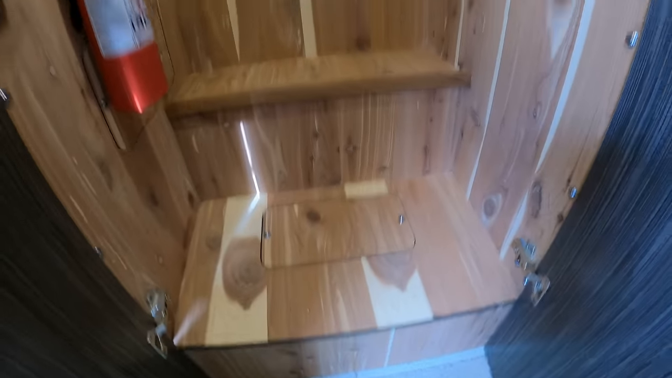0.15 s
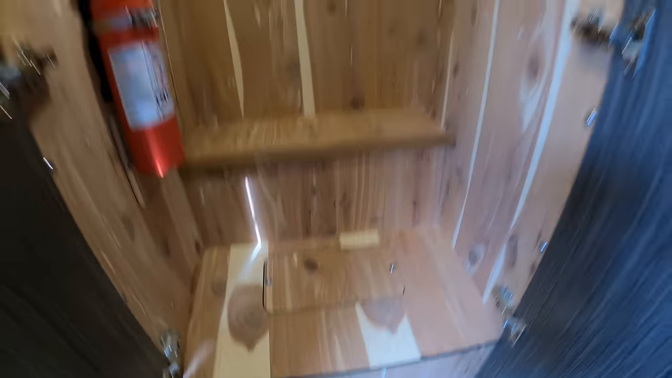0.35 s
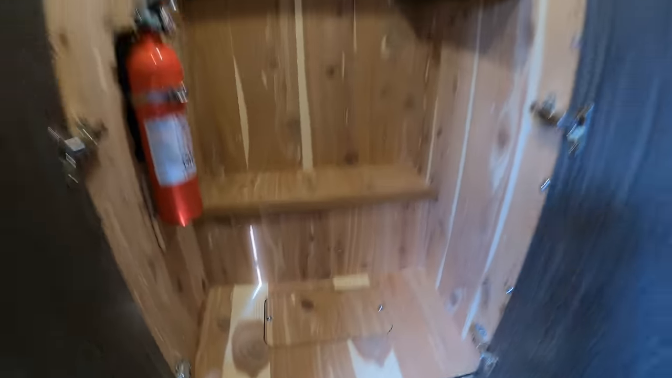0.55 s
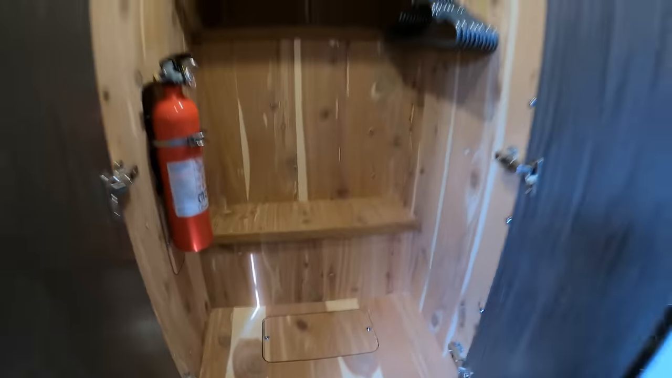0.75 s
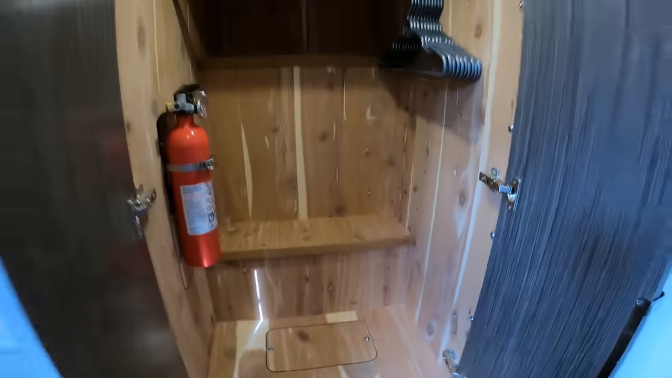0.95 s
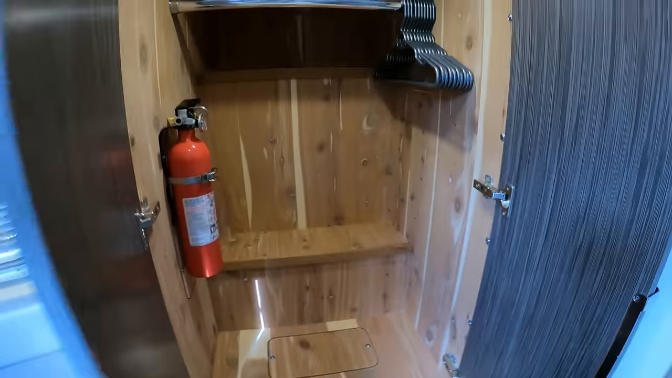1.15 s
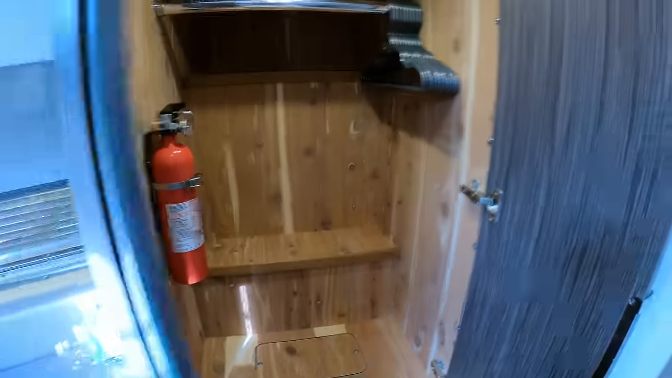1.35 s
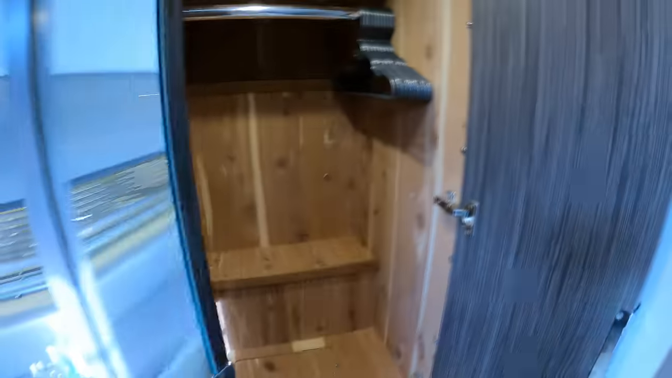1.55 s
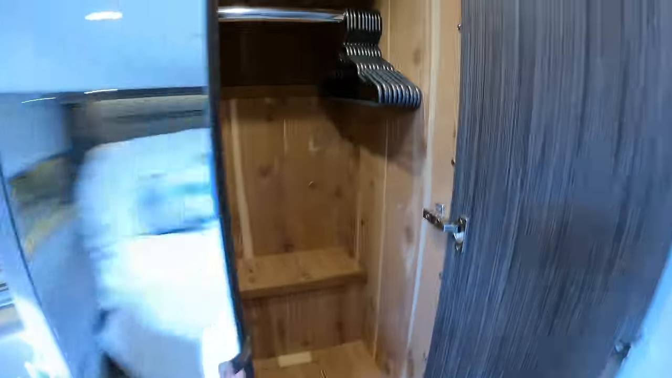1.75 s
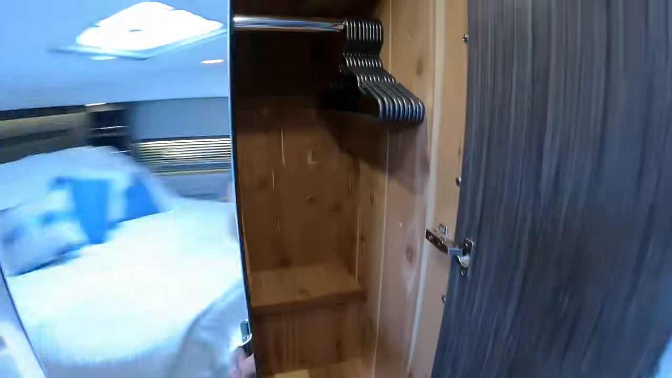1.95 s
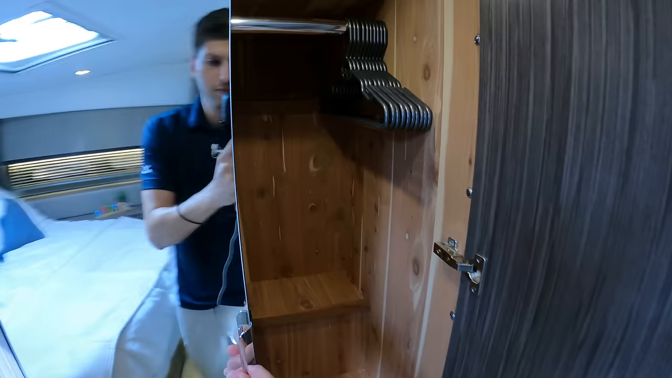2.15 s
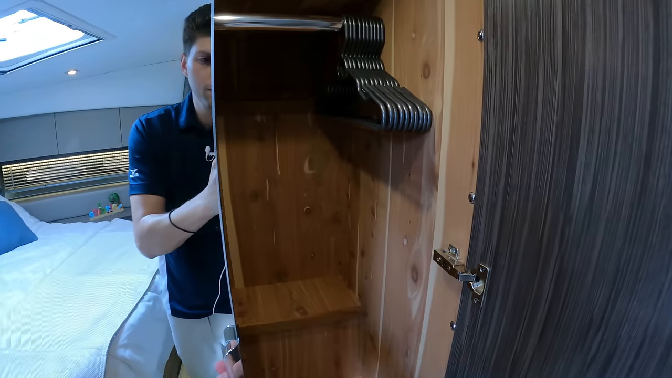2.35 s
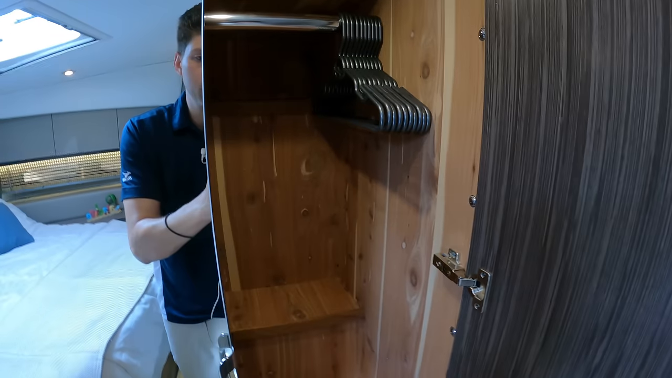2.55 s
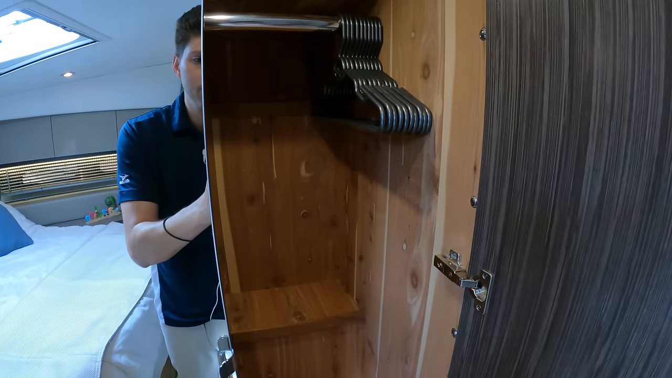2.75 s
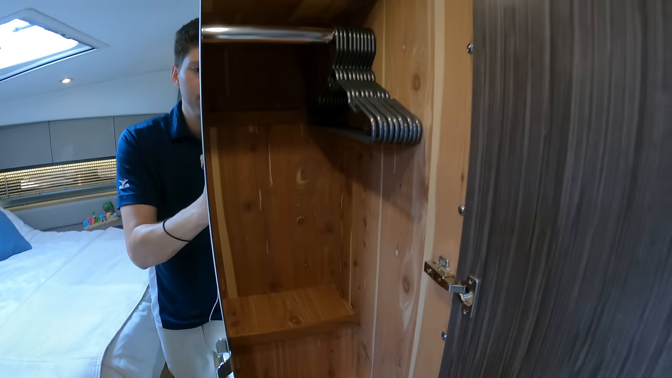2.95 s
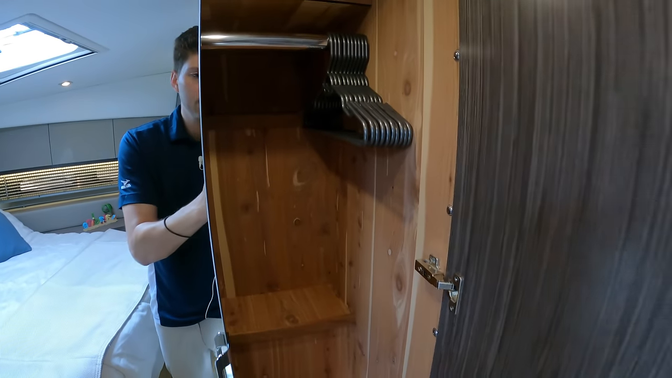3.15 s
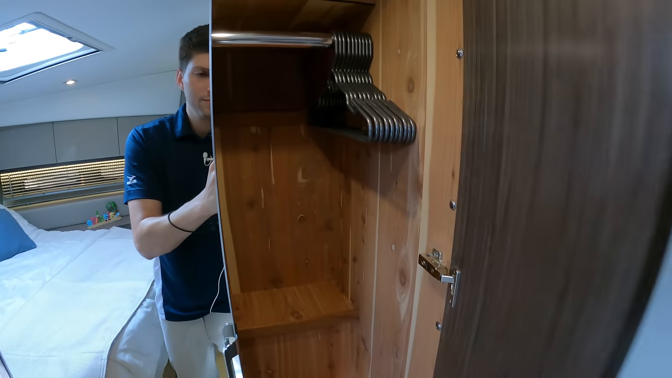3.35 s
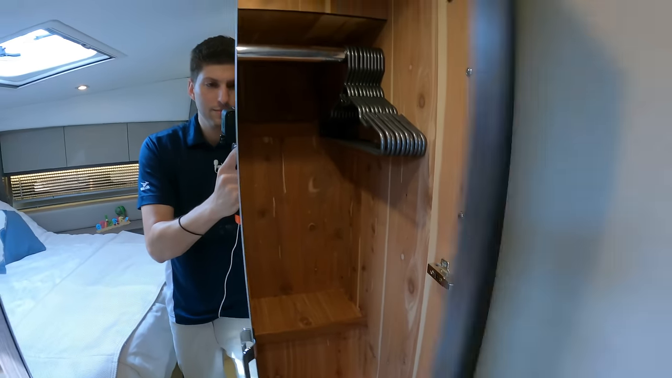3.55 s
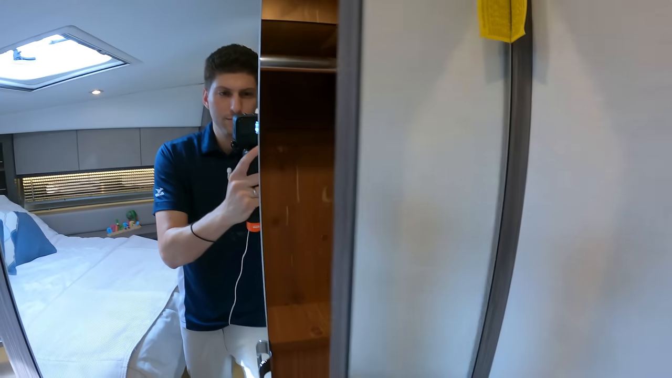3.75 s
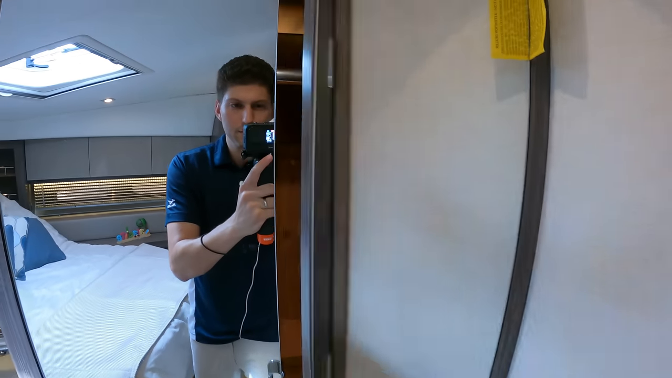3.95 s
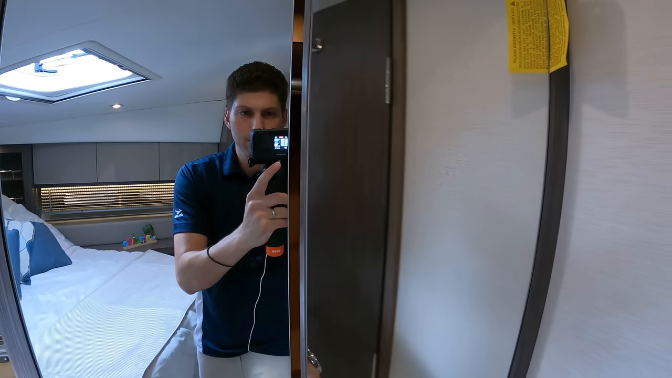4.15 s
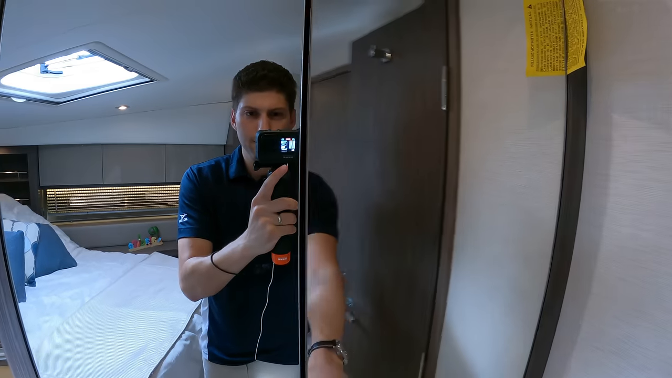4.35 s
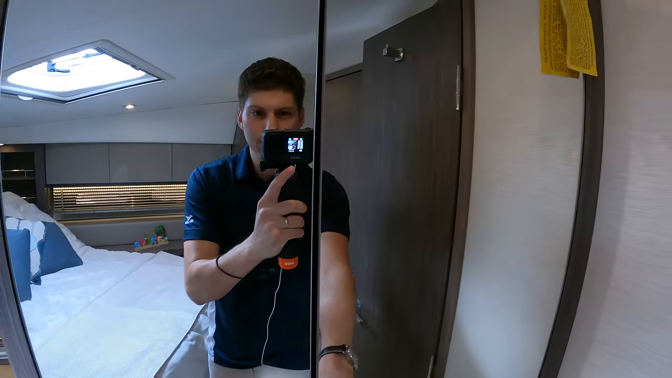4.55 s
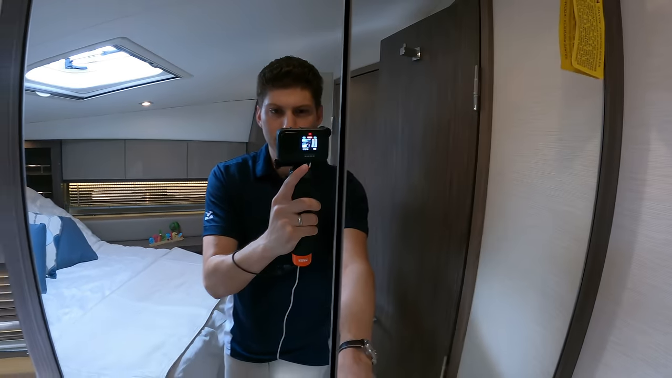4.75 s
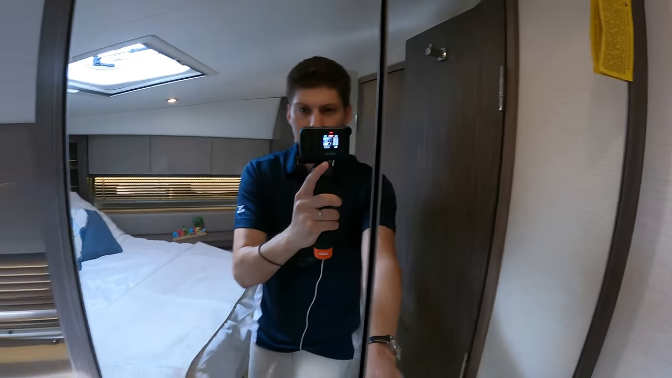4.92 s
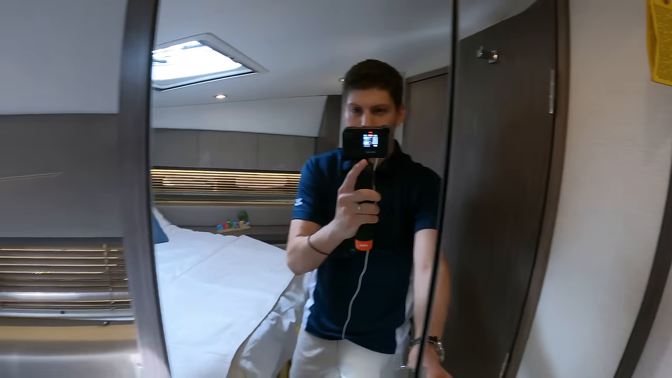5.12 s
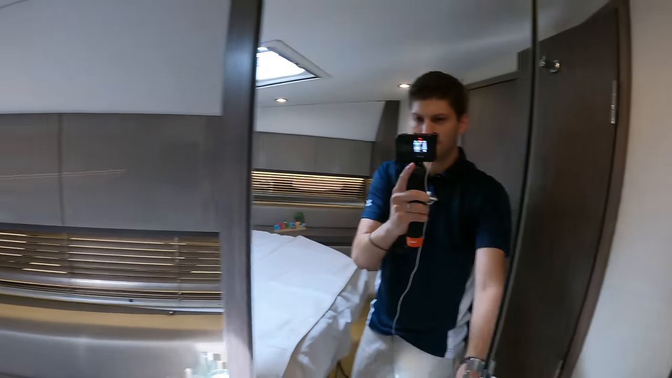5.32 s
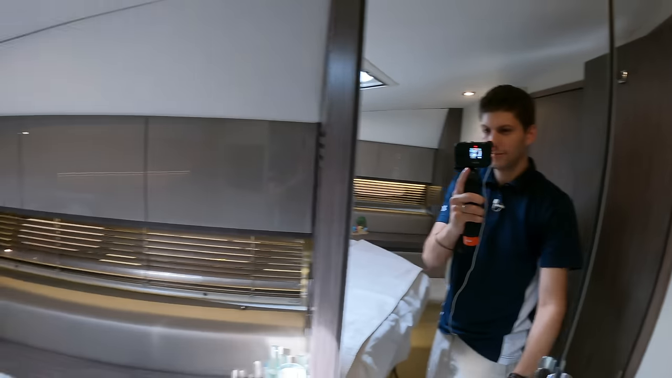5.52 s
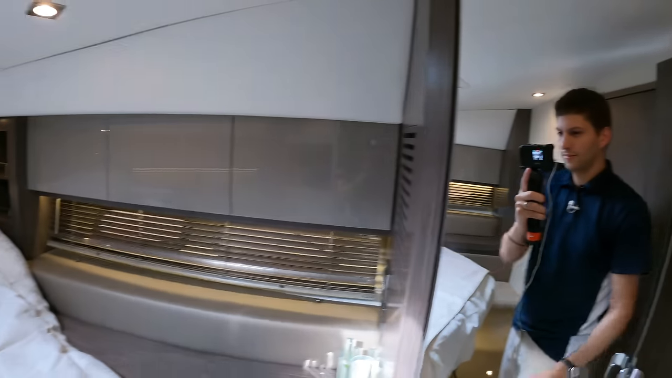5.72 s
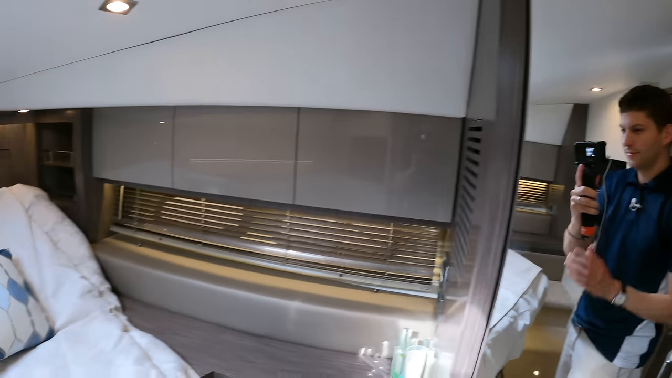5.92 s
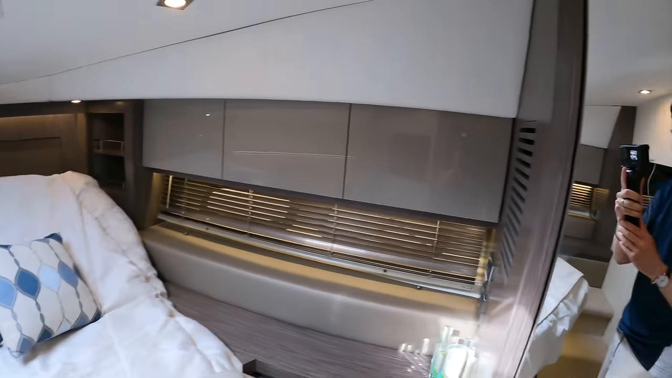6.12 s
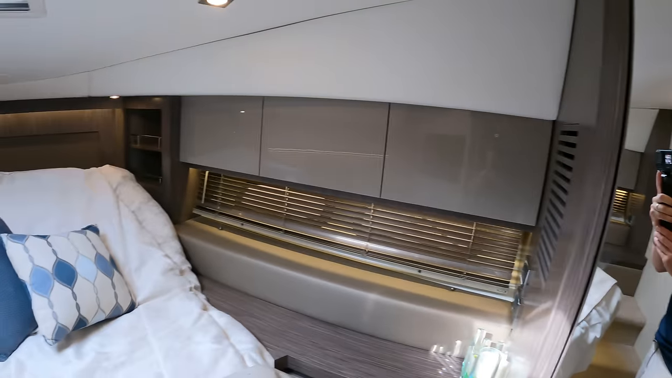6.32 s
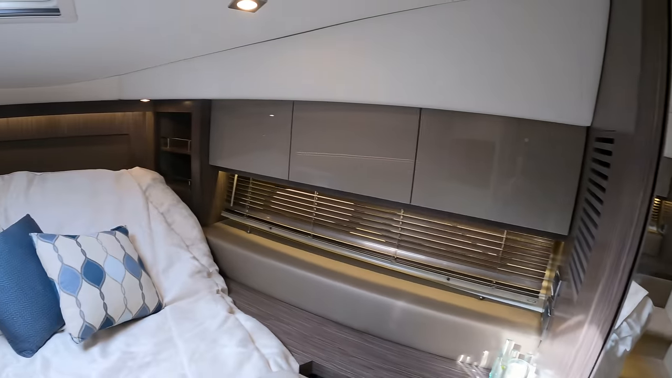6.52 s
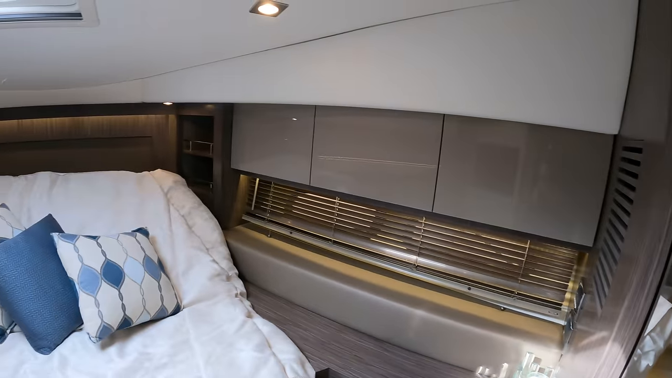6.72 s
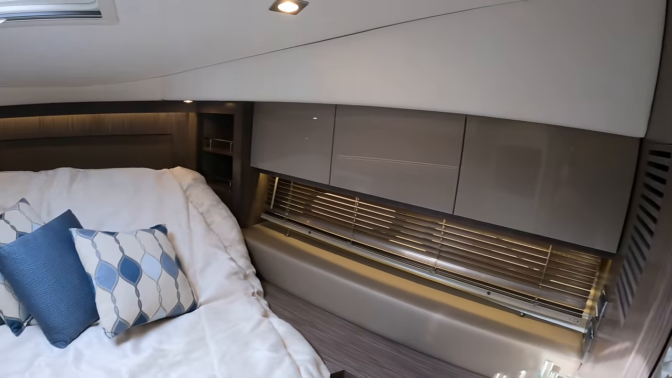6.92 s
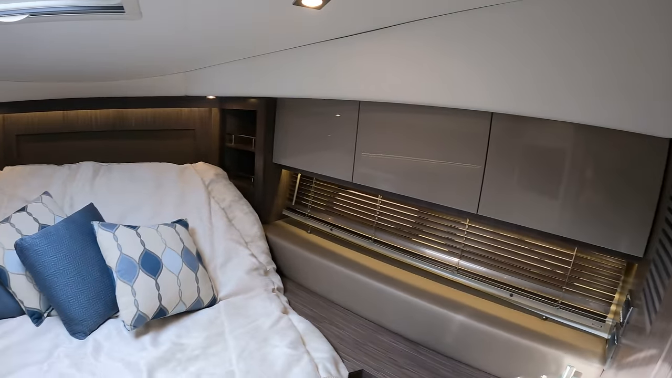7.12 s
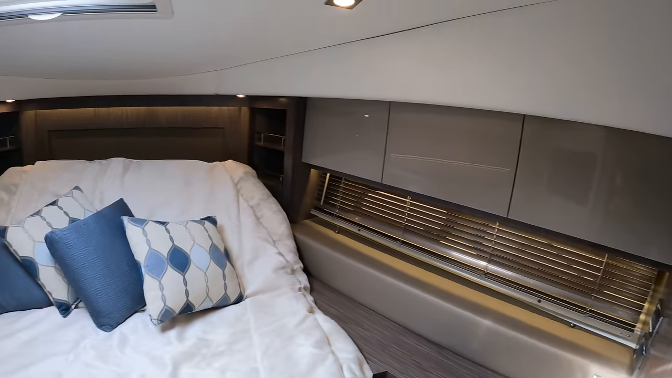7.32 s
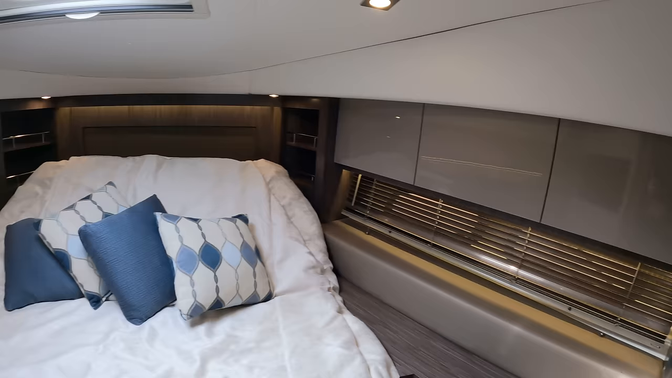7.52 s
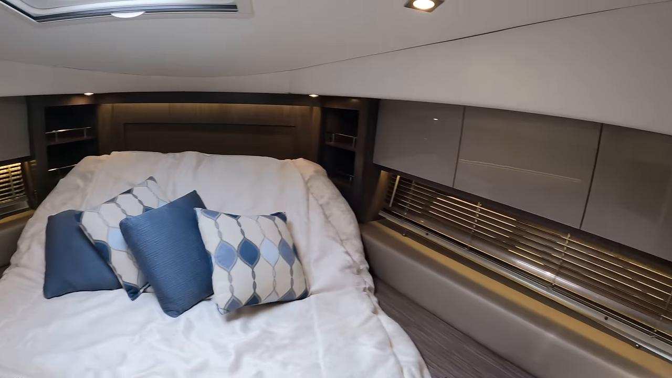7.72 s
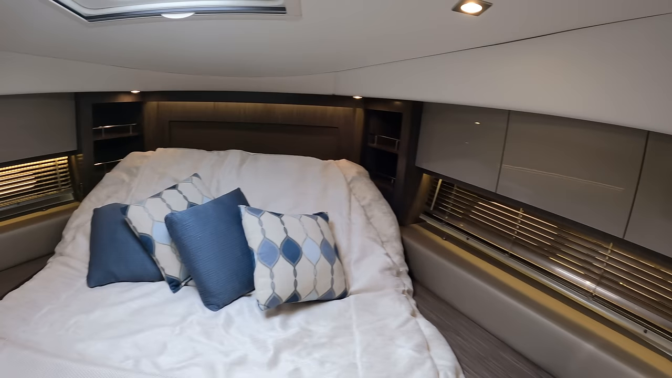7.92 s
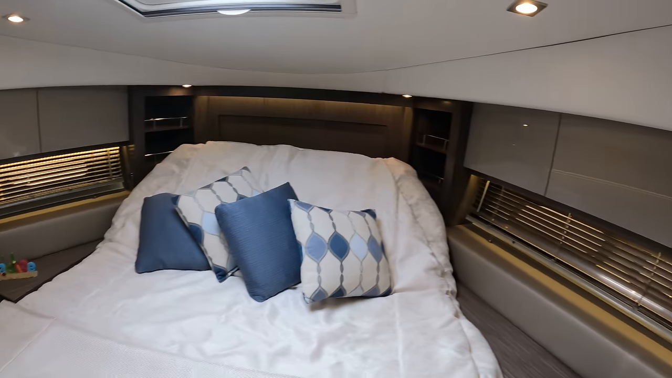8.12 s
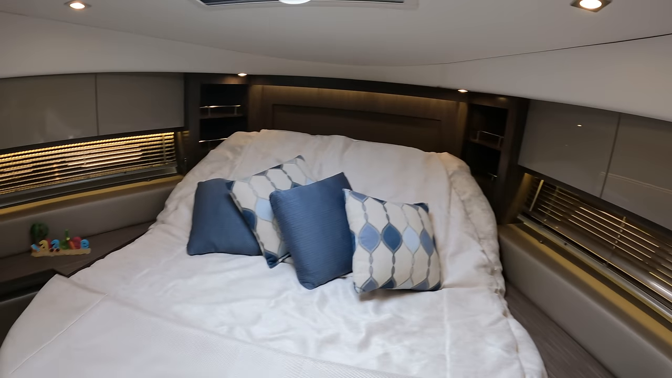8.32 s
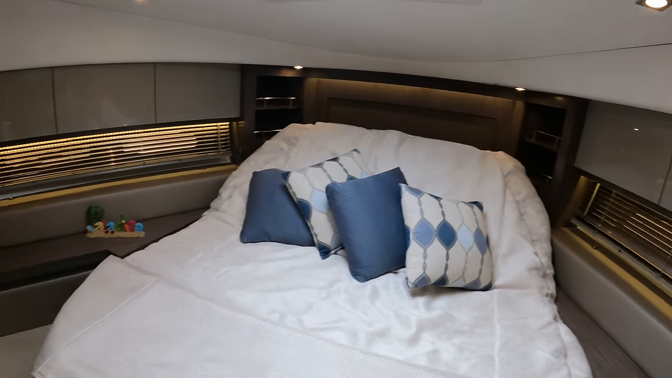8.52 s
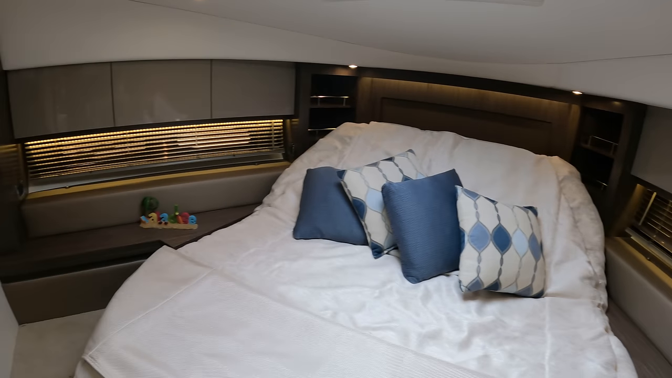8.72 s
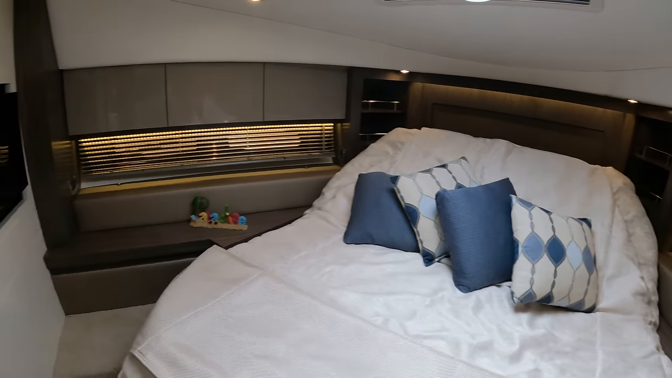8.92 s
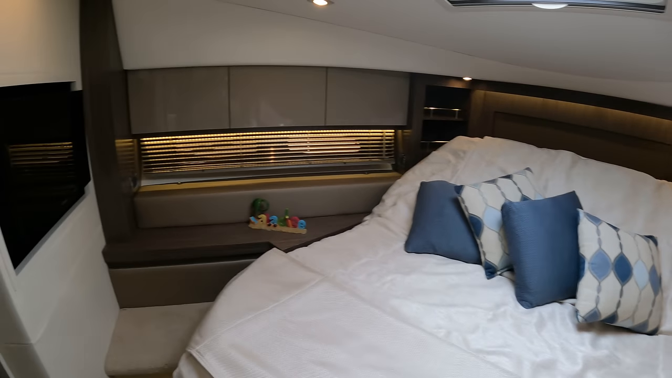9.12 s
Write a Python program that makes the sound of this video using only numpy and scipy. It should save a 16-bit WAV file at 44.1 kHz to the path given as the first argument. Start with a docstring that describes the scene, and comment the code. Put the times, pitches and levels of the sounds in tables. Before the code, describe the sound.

Two wooden closet doors latch and bang closed one after another in a small padded cabin, with light taps and constant low humming air.

```python
"""In a small, padded boat cabin, two wooden closet doors are swung shut: the first knocks twice on its way,
then each snaps into its metal latch, slams on the frame and sets the closet booming.
Hands tap the panels, hinges rub, doors and sleeves swish, low rumbles swell and the ventilation hums throughout.
Contacts are noise cracks with a reverberant tail plus decaying modes; swings, taps and booms are damped sines.
Friction, swishes, rumble and air are coloured noise."""
import sys
import numpy as np
from scipy import signal
from scipy.fft import rfft, irfft, next_fast_len
from scipy.io import wavfile
from scipy.ndimage import map_coordinates

SR = 44100
rng = np.random.default_rng(int(sys.argv[2]) if len(sys.argv) > 2 else 0)


def output_pcm(signal):
    """Save a mono or channel-first signal as 16-bit PCM at the path in sys.argv[1].

    Samples are clipped to [-1, 1] before scaling.
    """
    pcm = np.clip(np.atleast_2d(signal).T, -1, 1) * 32767
    wavfile.write(sys.argv[1], SR, np.round(pcm).astype(np.int16))


N = 408807  # length [samples]


def amp(db):
    """Decibels to gain."""
    return 10 ** (np.asarray(db) / 20)


def unit(x):
    """Scale to rms 1."""
    return x / np.sqrt(np.mean(x ** 2) + 1e-20)


def along(points, hz):
    """Read (frequency [Hz], value) points on a log frequency axis."""
    point_hz, values = np.transpose(points)
    return np.interp(np.log(hz + 1), np.log(point_hz), values)


def wobble(rate):
    """A smooth random curve with rate knots a second."""
    return map_coordinates(rng.standard_normal(400), [np.arange(N) * rate / SR], mode="mirror")


def filtered(x, response):
    """Filter x by a gain that depends on frequency."""
    size = next_fast_len(len(x) + 8192)
    hz = np.fft.rfftfreq(size, 1 / SR)
    return irfft(rfft(x, size) * response(hz), size)[:len(x)]


def noise(response):
    """Noise of rms 1 coloured by the given response."""
    return unit(filtered(rng.standard_normal(N), response))


def causal(colour, tilt_db, size=4096):
    """Minimum-phase impulse response of energy 1: a colour tilted in dB per octave above 250 Hz."""
    hz = np.fft.rfftfreq(size, 1 / SR)
    level_db = along(colour, hz) + tilt_db * np.log2(np.maximum(hz, 250))
    cepstrum = irfft(np.log(amp(level_db)))
    # folding the cepstrum onto positive times puts the energy at the start
    cepstrum[1:size // 2] *= 2
    cepstrum[size // 2 + 1:] = 0
    response = irfft(np.exp(rfft(cepstrum)))
    return response / np.linalg.norm(response)


def add(track, s, sound):
    """Mix a sound into the track at time s."""
    part = track[round(s * SR):][:len(sound)]
    part += sound[:len(part)]


# how long the padded cabin reverberates: (frequency [Hz], t60 [s])
CABIN_DECAY = [(80, 0.46), (300, 0.26), (800, .17), (2000, .155), (6000, 0.16), (10000, 0.16),
               (15000, 0.14)]


def contact(colour, tilt_db, crack_db, crack_s):
    """A short crack over the cabin's dense reflections, whose bass lingers longest."""
    hz, frames, spectrum = signal.stft(rng.standard_normal(SR // 2), SR, nperseg=256)
    decay = amp(-60 * frames / along(CABIN_DECAY, hz)[:, None])
    tail = signal.istft(spectrum * decay, SR, nperseg=256)[1][:SR // 2]
    t = np.arange(len(tail)) / SR
    crack = 2 * amp(crack_db) * np.exp(-t / crack_s) * rng.standard_normal(len(t))
    rise = 0.00045 * 2 ** (-tilt_db / 2.4)  # a duller contact is softer and builds more slowly
    burst = (crack + tail) * (1 - np.exp(-t / rise))
    return signal.fftconvolve(burst, causal(colour, tilt_db))[:len(t)]


def ring(modes, tilt_db):
    """Decaying modes, struck at new strengths by every blow; none rings longer than a t60 of 0.18 s."""
    t = np.arange(SR // 2) / SR
    hz, db, t60 = np.transpose(modes)[:, :, None]
    t60 = np.minimum(t60, .18)
    strength = amp(db + tilt_db * np.log2(hz) + rng.normal(0, 1.5, hz.shape))
    swings = np.sin(2 * np.pi * (hz * t + rng.random(hz.shape))) * amp(-60 * t / t60)
    mixed = np.sum(strength * swings, axis=0) / np.linalg.norm(strength)
    return mixed * (1 - np.exp(-t / 0.00037))


def note(hz, t60):
    """One damped resonance that builds within about a cycle."""
    t = np.arange(SR // 2) / SR
    return np.sin(2 * np.pi * hz * t) * amp(-60 * t / t60) * (1 - np.exp(-2 * hz * t))


def swing(hz, t60, rise):
    """A few slow, deep swings that build softly."""
    t = np.arange(SR) / SR
    return amp(-60 * t / t60) * (1 - np.exp(-t / rise)) * np.sin(2 * np.pi * hz * t)


# a movement is this far down one rise before and one fall after its peak
SWELL_DROP_DB, SWELL_ROUNDNESS = 8.5, 0.99


def swells(rows):
    """Gain per sample of movements that gather speed and slow down again."""
    t, power = np.arange(N) / SR, np.zeros(N)
    for s, db, rise, fall in rows:
        away = np.abs(t - s) / np.where(t < s, rise, fall)
        power += amp(db - SWELL_DROP_DB * away ** SWELL_ROUNDNESS) ** 2
    return np.sqrt(power)


# a door meets its frame, also played by booms(): (time [s], level [dB], brightness [dB/octave],
# first crack [dB], note [Hz], note level [dB], time pressed on the catch before landing [s],
# door's drum [Hz], drum level [dB], trapped air level [dB])
SLAMS = [(2.263, -9, -1, 1.5, 670, -7, .056, 88.7, -5, -31),
         (4.465, -11.5, 1, -22, 357, -6, .076, 100.2, -7.5, -14)]
# colour of a door landing on the frame: (frequency [Hz], level [dB])
FRAME_COLOUR = [(40, -8), (110, 7.5), (180, 1.5), (270, -8.5), (360, -2.5), (520, -11.5), (720, -6.5),
                (1000, -17.5), (1400, -16.5), (2000, -20.5), (3000, -24), (6000, -34), (10000, -48),
                (16000, -67)]
# modes of the closet frame, before the cap in ring(): (frequency [Hz], level [dB], t60 [s])
CARCASS_MODES = [(242, -2, .2), (306.5, -4.5, 0.21), (345, -6.5, 0.14), (388, -4, 0.3), (436, -1.5, .15),
                 (518, -4.5, 0.16), (630, -10, 0.14), (750, -3, 0.11), (910, -11.5, .12), (1003, -18, 0.25)]
# modes of the door panel, before the same cap, also rung by knocks(): (frequency [Hz], level [dB], t60 [s])
PANEL_MODES = [(358.5, 1.5, 0.12), (496, -1.5, 0.14), (610, -9, 0.12), (786, -5, 0.26), (923, -4.5, 0.099),
               (1124, -8, .09), (1214, -4.5, 0.079), (1590, -7, .09), (1746, -8.5, 0.089), (2061, -7, 0.11),
               (2260, -10, .1), (2700, -17.5, .07), (3700, -19, .07), (4260, -18, 0.086)]


def slams():
    """Just after the latch, the door lands on the frame and shakes the whole closet and its own panel."""
    out = np.zeros(N)
    for s, db, tilt_db, crack_db, note_hz, note_db, *_ in SLAMS:
        blow = amp(-6.0) * contact(FRAME_COLOUR, tilt_db, crack_db, crack_s=.011)
        carcass = amp(-8) * ring(CARCASS_MODES, tilt_db)
        panel = amp(-18.5) * ring(PANEL_MODES, tilt_db)
        own_note = amp(note_db) * note(note_hz, t60=0.11)
        add(out, s, amp(db) * (blow + carcass + panel + own_note))
    return out


# deep modes of the closet: (frequency [Hz], level [dB], t60 [s], lag behind the landing [s])
CLOSET_BOOMS = [(172, -11.5, 0.18, 0.00087), (58, -2.5, 0.22, .051)]
SWAY_HZ, SWAY_DB, SWAY_T60_S = 56, -10.5, .5  # a door pressed against its catch
TRAPPED_HZ, TRAPPED_T60_S, TRAPPED_RISE_S = 29.09, 0.99, .02  # the air shut in behind it
DRUM_LAG_S, DRUM_T60_S = 0.0066, 0.2  # the whole door drumming as it lands


def booms():
    """A door sways on its catch and squeezes the air inside, then drums and wakes the closet's deep modes."""
    out = np.zeros(N)
    for s, *_, pressed_s, drum_hz, drum_db, trapped_db in SLAMS:
        sway = amp(SWAY_DB) * swing(SWAY_HZ, SWAY_T60_S, rise=.0055)
        trapped_air = amp(trapped_db) * swing(TRAPPED_HZ, TRAPPED_T60_S, TRAPPED_RISE_S)
        add(out, s - pressed_s, sway)
        add(out, s - pressed_s, trapped_air)
        add(out, s + DRUM_LAG_S, amp(drum_db) * swing(drum_hz, DRUM_T60_S, rise=0.0018))
        for hz, db, t60, lag in CLOSET_BOOMS:
            add(out, s + lag, amp(db) * swing(hz, t60, rise=0.002))
    return out


# metal clicks of latches and hinges: (time [s], level [dB], brightness [dB/octave], first crack [dB],
# ping [Hz], ping level [dB])
CLICKS = [(.780, -52, -2.5, 9, 1700, 1), (0.995, -48, -5, 3, 1810, -5), (1.025, -52, -6.5, -7, 4000, -8),
          (2.19, -42, -4.5, -0.5, 2100, 0), (2.212, -28.5, -3, -8.5, 1950, -6),
          (2.227, -19.5, 0.9, 7.5, 3700, -4.5), (2.846, -58.5, 5, -5.5, 9900, 6),
          (3.378, -53, -2, 10, 7300, 8), (4.422, -30, -4.5, 2.5, 7700, 2),
          (4.449, -22.5, 0.5, 11.5, 5680, 11.5), (4.712, -54.5, -2.5, 10.5, 7020, 12.5),
          (4.817, -62.5, -1.5, 17, 7700, 4)]
# colour of a metal contact: (frequency [Hz], level [dB])
METAL_COLOUR = [(100, -18), (400, -2), (800, -2.5), (1400, -1), (2400, -3), (3200, 1.5), (4400, -3),
                (5700, -2.5), (6700, -2), (8600, 2), (10500, -4.5), (14000, -6), (16000, -14.5)]
# modes of the steel catch: (frequency [Hz], level [dB], t60 [s])
STEEL_MODES = [(2000, -7.5, .08), (3120, 0, 0.044), (3760, -2, 0.039), (5400, 1, 0.057), (6900, 4.5, .08),
               (8400, 4.5, .08), (9200, 4, 0.055)]


def latches():
    """Bright snaps of the catches and small ticks of the hinges: a contact, a ping and a brief steel ring."""
    out = np.zeros(N)
    for s, db, tilt_db, crack_db, ping_hz, ping_db in CLICKS:
        snap = amp(-2.0) * contact(METAL_COLOUR, tilt_db, crack_db, crack_s=0.0015)
        ping = amp(ping_db) * note(ping_hz, t60=0.011)
        steel = amp(crack_db - 12.5) * ring(STEEL_MODES, tilt_db)  # a sharper crack rings it harder
        add(out, s, amp(db) * (snap + ping + steel))
    return out


# knocks and taps on the door panels: (time [s], level [dB], brightness [dB/octave], first crack [dB],
# note of the struck spot [Hz], note level [dB], thud [Hz], thud level [dB])
KNOCKS = [(0.543, -36.5, -10.5, 11.5, 297, 1, 209, -2), (1.41, -56, 0, 2, 1550, -6, 90, 2),
          (1.495, -44.5, -5.5, -17, 600, 8.5, 90, 20.5), (1.554, -20, 0.26, 4.5, 1800, 1.5, 104, 5.5),
          (1.632, -27.5, 0.9, 5.5, 1110, 8.5, 69, 10.5), (2.235, -29, 0.5, -5.5, 410, 6.5, 141, 15.5),
          (2.471, -50.5, 1.5, -19, 1760, 4, 61.7, 28), (2.602, -62.5, 6.5, -1, 1520, 8, 89.5, 1),
          (2.85, -51.5, -5, -1, 300, 20, 90, 20.5), (3.381, -46, -3, 5, 1187, 9.5, 83.5, 15),
          (3.542, -52, 0, 5.5, 1200, 12.5, 150, 14), (3.875, -63.5, 2, 1, 1800, 2, 90, 0),
          (4.389, -40.5, 0.5, 2.5, 1810, 1, 130, 19.5), (4.468, -25.5, -7.5, -4, 1243, -1.5, 189.1, 4.5),
          (8.027, -56, -8, 6, 1050, 9, 89.8, 2), (8.71, -62.5, -5.5, -3, 1217, 3, 90, -1),
          (9.135, -59.5, -2, -1, 1700, -3, 91, 1)]
# colour of a wooden contact: (frequency [Hz], level [dB])
WOOD_COLOUR = [(60, -18), (170, -3), (260, -2), (400, 0), (650, 1), (900, -3.5), (1300, -2), (2050, -2.5),
               (2450, -10), (4200, -17.5), (7000, -18), (10000, -24.5), (16000, -34.5)]
THUD_T60_S, THUD_RISE_S = 0.17, 0.0042  # a panel flexing under a knock
NOTE_T60_S, NOTE_DAMPING = 0.044, .75  # a struck spot's ring at 1 kHz; power of pitch by which it shortens


def knocks():
    """Hard, woody contacts ring the door panel and flex it with a thud; each spot has a note of its own."""
    out = np.zeros(N)
    for s, db, tilt_db, crack_db, note_hz, note_db, thud_hz, thud_db in KNOCKS:
        clack = amp(-1.0) * contact(WOOD_COLOUR, tilt_db, crack_db, crack_s=0.0048)
        panel = amp(2) * ring(PANEL_MODES, tilt_db)
        spot = amp(note_db) * note(note_hz, t60=NOTE_T60_S * (10 ** 3 / note_hz) ** NOTE_DAMPING)
        add(out, s, amp(db) * (clack + panel + spot))
        add(out, s, amp(db + thud_db) * swing(thud_hz, THUD_T60_S, THUD_RISE_S))
    return out


# hinges rub while a door swings: (start [s], end [s], level [dB], resonance [Hz])
RUBS = [(.15, .68, -74, 2040), (3.65, 4.35, -69.5, 2640)]


def hinges():
    """Faint, uneven friction in one resonance, swelling with the speed of the swing."""
    out, t = np.zeros(N), np.arange(N) / SR
    for start, end, db, centre_hz in RUBS:
        speed = np.sin(np.pi * np.clip((t - start) / (end - start), 0, 1))
        uneven = amp(db + 2.0 * wobble(33))
        out += speed * uneven * noise(lambda hz: 1 / (1 + ((hz - centre_hz) / 380) ** 2))
    return out


# doors and sleeves swish past: (fastest moment [s], level [dB], rise [s], fall [s])
SWISHES = [(.53, -71, .25, 0.12), (2.12, -63.5, 0.29, 0.07), (4.24, -59, .42, 0.16), (5.52, -73, .08, 0.67),
           (6.3, -68, .25, 0.11), (6.53, -70.5, .06, .14), (8.68, -71, .18, 0.11), (9.22, -71.5, .35, .15)]
# colour of a swish: (frequency [Hz], level [dB])
SWISH_COLOUR = [(400, -24), (800, 1.5), (1500, -4), (2000, -5), (2650, -2.5), (3500, -6.5), (5200, -12),
                (9000, -12), (16000, -23.5)]
# handling rumbles: (strongest moment [s], level [dB], rise [s], fall [s])
HANDLING = [(.9, -39, 1.4, .4), (3, -36.5, 1.2, 0.85), (4.75, -36, .3, 0.67)]
# colour of the rumble: (frequency [Hz], level [dB])
RUMBLE_COLOUR = [(8, -17), (20, -3.5), (27, 5.5), (39, -14), (57, -2), (90, -20), (250, -29.5), (700, -42),
                 (2000, -75)]


def movement():
    """Doors and sleeves swish unevenly; handling stirs the cabin's lowest resonances."""
    uneven = amp(2.0 + 1.4 * wobble(34))
    swish = swells(SWISHES) * uneven * noise(lambda hz: amp(along(SWISH_COLOUR, hz)))
    rumble = swells(HANDLING) * noise(lambda hz: amp(along(RUMBLE_COLOUR, hz)))
    return swish + rumble


# colour of the ventilation noise: (frequency [Hz], relative level [dB])
AIR_COLOUR = [(12, -13.5), (25, -5), (38, -10), (65, -7), (90, -15.5), (160, -20), (225, -28), (350, -26.5),
              (480, -29), (740, -40.5), (1100, -47.5), (1960, -54.5), (4200, -58.5), (16000, -60)]
# resonances of the air flow: (frequency [Hz], width [Hz], level [dB])
DUCTS = [(26, 4.3, -44.5), (56, 4, -45.5), (115, 25, -57.5), (162, 12, -63), (331.7, 27, -60),
         (388, 30, -65), (612, 25, -75), (4200, 200, -92)]
# motor and fan tones: (frequency [Hz], level [dB])
HUM_TONES = [(59.2, -45), (118.4, -58), (274.5, -64.5), (360.7, -56), (597.5, -71.5), (958.2, -81),
             (1050, -84.5), (1082, -80), (4221, -91)]


def ventilation():
    """Air rushes through resonant ducts under slightly unsteady motor and fan tones."""
    t = np.arange(N) / SR
    out = amp(-45) * noise(lambda hz: amp(along(AIR_COLOUR, hz)))
    for centre, width, db in DUCTS:
        out += amp(db) * noise(lambda hz: 1 / (1 + (2 * (hz - centre) / width) ** 2))
    for hz, db in HUM_TONES:
        level = amp(db + 1.0 * wobble(3.4)) * np.sqrt(2)  # a sine peaks at root 2 times its rms
        out += level * np.sin(2 * np.pi * hz * t + .5 * wobble(4.5))
    hiss_colour = [(1000, -23.5), (4000, -11.5), (8500, 1.5), (15000, -6.5)]  # (frequency [Hz], level [dB])
    return out + amp(-75.0) * noise(lambda hz: amp(along(hiss_colour, hz)))


def scene():
    """All sources mixed to one channel."""
    doors = slams() + booms() + latches() + knocks() + hinges()
    return (doors + movement() + ventilation())[None]


TOP_HZ = 15550  # upper band limit


def record(dry):
    """Round off the highest peaks, then cut steeply above the band limit."""
    rounded = dry[0] / (1 + np.abs(dry[0] / .97) ** 8) ** (1 / 8)
    return filtered(rounded, lambda hz: 1 / np.sqrt(1 + (hz / TOP_HZ) ** 120))[None]


dry = scene()
out = record(dry)
output_pcm(out)
```